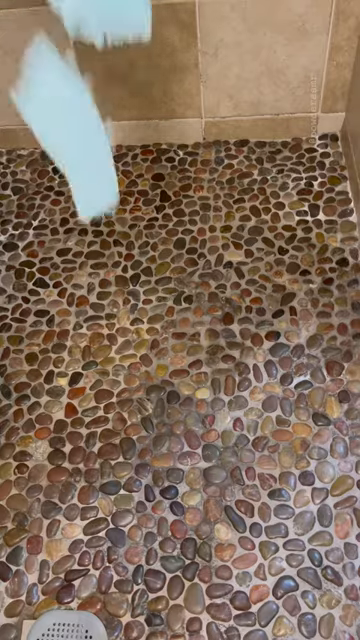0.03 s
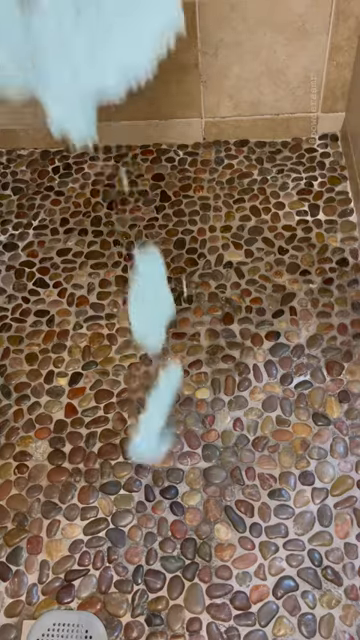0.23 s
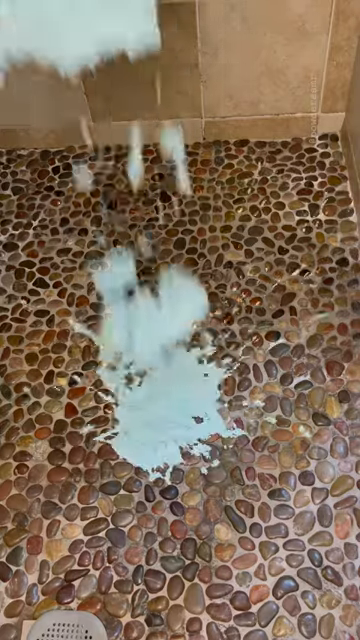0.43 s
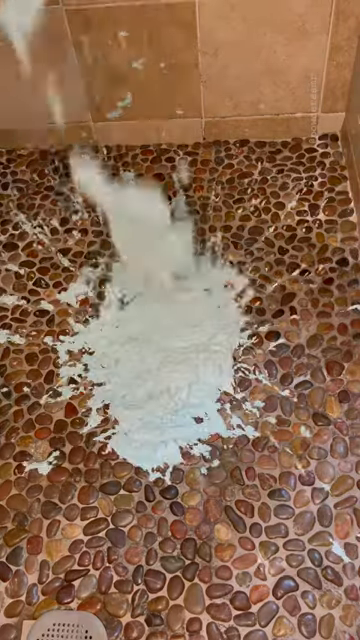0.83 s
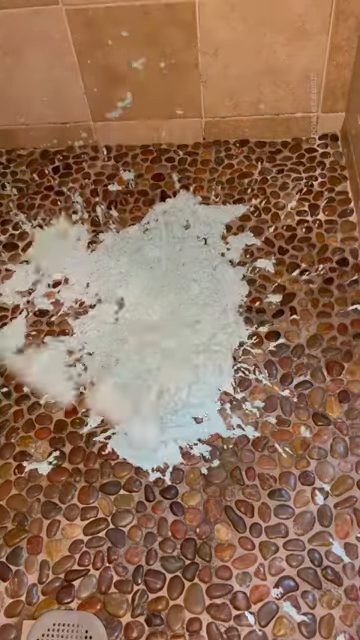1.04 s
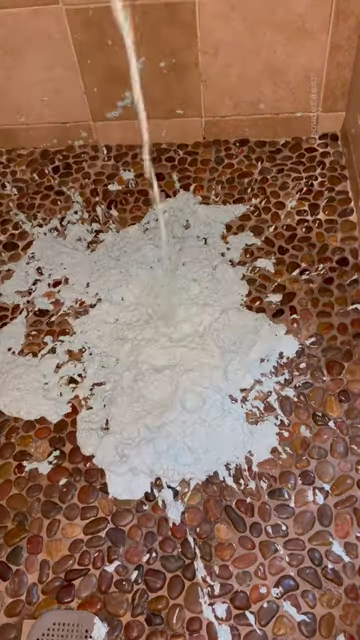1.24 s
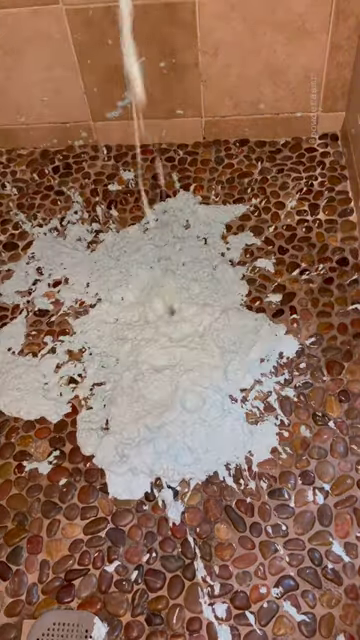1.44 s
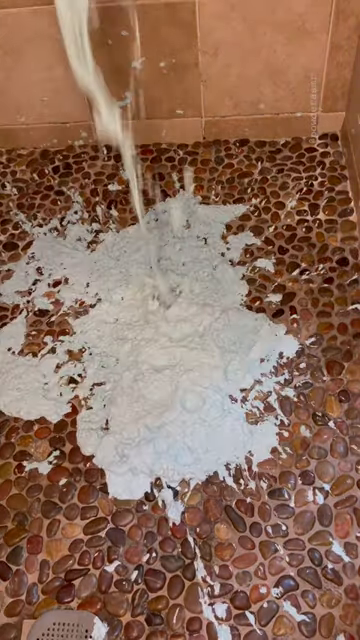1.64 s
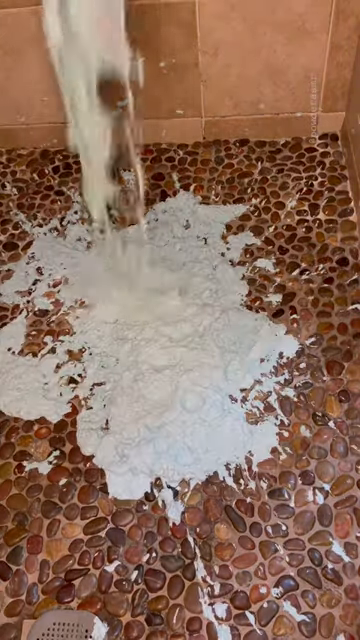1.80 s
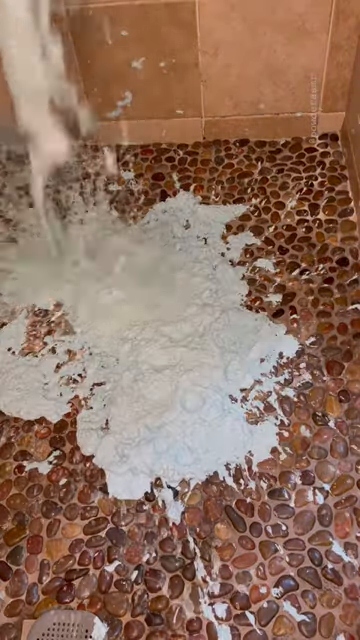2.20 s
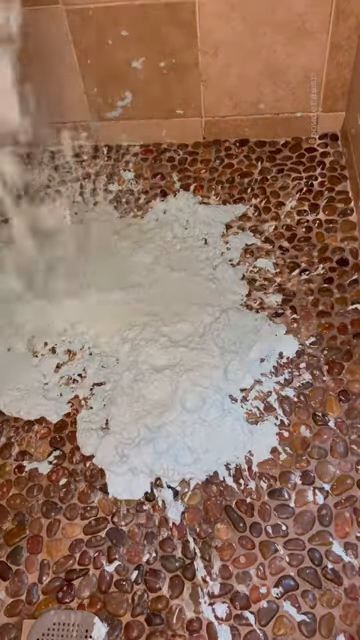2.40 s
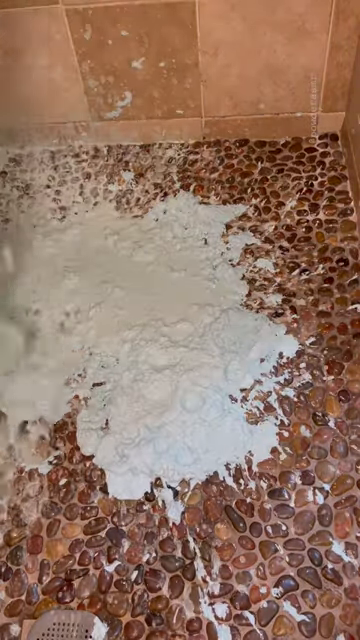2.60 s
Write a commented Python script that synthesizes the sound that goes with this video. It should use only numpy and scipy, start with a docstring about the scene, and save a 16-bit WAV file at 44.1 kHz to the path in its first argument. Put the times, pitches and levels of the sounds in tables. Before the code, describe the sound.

Wet splats of paste thud onto stone, followed by a hissing, splashing pour.

```python
"""Paste and a pour in a shower stall

Inside a tiled shower, heard through a closely spaced microphone pair. In slow motion, lumps of thick
paste splat on the pebble floor, pop pockets of air and set the stall booming over a faint rush and hum.
Then, at normal speed, a thin stream lands in the paste and swells to a pour: its droplets hiss and
splash, the puddle gurgles, bubbles ring, and the nearby tiles echo it all."""
import sys
import numpy as np
from scipy import signal
from scipy.fft import rfft, irfft
from scipy.io import wavfile

SR = 44100
rng = np.random.default_rng(int(sys.argv[2]) if len(sys.argv) > 2 else 0)


def inscribe(sig):
    """Save sig as 16-bit PCM at rate SR to the path in sys.argv[1].

    A 1-D sig is mono; a 2-D sig holds one channel per row.
    Samples are clipped to [-1, 1] before scaling.
    """
    pcm = np.round(np.clip(np.atleast_2d(sig).T, -1, 1) * 32767)
    wavfile.write(sys.argv[1], SR, pcm.astype(np.int16))


N = 121275
TIME = np.arange(N) / SR
SLOW_SPEED, CUT_S = .665, 1.184  # the slow motion: its speed and its end

# Lumps landing (time [s], rise [s], fade [s], thud [dB], squelch [dB], slap [dB], spray [dB])
LUMPS = [(0.1989, 0.0041, 0.021, -26.5, -18, -25, -14), (0.271, 0.0051, 0.018, -29.5, -24.5, -20, -15),
         (.428, 0.0029, 0.0078, -11.5, -12.5, -12, -6.5), (0.485, 0.031, 0.19, -36, -33.5, -37, -31.5),
         (0.64, 0.0032, 0.0049, -5.5, -11.5, -13.5, -8), (0.695, 0.032, 0.044, -28, -22, -27, -23.5),
         (0.82, 0.012, 0.014, -22.5, -17, -22, -23), (.862, 0.0136, 0.02, -24.5, -27, -25.5, -24),
         (.972, 0.005, 0.014, -26, -20, -23.5, -17), (1.032, 0.0088, 0.0043, -48, -51, -28.5, -24.5),
         (1.083, 0.024, 0.0074, -43, -30.5, -47, -60)]
THUD_LAG_S, THUD_PULSE_S, THUD_FADE_S, BOOM_DB = .00526, .0012, .022, 24
SQUELCH_LAG_S, SQUELCH_STRETCH = .005, 1.34
# Air pockets popping under the lumps, and the ringing of two slaps (time [s], pitch [Hz], level [dB])
PASTE_POCKETS = [(.205, 340, -17), (.208, 489.5, -20), (.273, 2350, -13), (.641, 1483, -11.5),
                 (.838, 530.3, -17), (.866, 643.6, -17), (.985, 524.3, -18)]
# Spectra of the four parts of a splat (frequency [Hz], relative level [dB])
THUD_TONE = [(25, -26), (55, -3), (115, 0), (290, -5.5), (700, -51.5)]
SQUELCH_TONE = [(80, -15), (260, -0.5), (560, 3.5), (1000, -9), (2000, -76.5)]
SLAP_TONE = [(300, -29), (800, -3.5), (2300, -2.5), (4200, -11.5), (7000, -41)]
SPRAY_TONE = [(1000, -16.5), (5000, -7), (8000, -5.5), (10300, -2), (11200, -4.5), (12200, -15),
              (15000, -87)]

# Strength of the stream (time [s], hiss [dB], splash [dB], gurgle [dB])
POUR_FLOW = [(1.185, -24.5, -38, -33), (1.30, -27.5, -39, -41), (1.365, -29.5, -34.5, -35.5),
             (1.40, -33.5, -45, -40.5), (1.60, -23, -35.5, -34.5), (1.65, -18, -31, -35),
             (1.701, -27, -37.5, -36), (1.75, -24, -37, -38), (1.78, -18.5, -33, -35.5),
             (2.01, -15.5, -29.5, -38), (2.09, -19.5, -31, -31.5), (2.142, -13.5, -24.5, -29.5),
             (2.22, -19.5, -35.5, -39.5), (2.29, -16, -32.5, -38.5), (2.35, -19.5, -31, -40),
             (2.40, -21, -43, -39), (2.47, -20, -33.5, -34), (2.55, -26.5, -38, -47.5),
             (2.615, -22, -32.5, -30), (2.66, -25.5, -34.5, -41.5), (2.71, -22.5, -32.5, -43.5)]
# Gouts hitting the puddle with a crack and a short spray (time [s], hiss [dB], splash [dB])
POUR_GOUTS = [(1.185, -20, -30.5), (1.404, -24, -53), (1.505, -19.5, -37.5), (1.615, -22, -37),
              (1.642, -18, -26), (1.7547, -14, -42), (1.99, -20, -23.5), (2.309, -27, -34),
              (2.465, -15.5, -47)]
GOUT_RISE_S, GOUT_FADE_S, CRACK_FADE_S, CRACK_DB = .0004, .0066, .0014, 3
# Air pockets closing in the puddle; the tiniest tick (time [s], pitch [Hz], level [dB])
POUR_POCKETS = [(1.186, 10500, -15), (1.19, 1554, -20), (1.269, 859, -26.5), (1.404, 5445, -16),
                (1.509, 657, -22.5), (1.652, 667, -26.5), (1.99, 1129, -14), (1.998, 1612, -26),
                (2.002, 620.4, -27), (2.101, 670, -26.5), (2.128, 1021, -20), (2.256, 992, -24.5),
                (2.346, 1000, -24.5), (2.433, 978, -14.5), (2.435, 543.7, -25.5)]
# Spectra of the three parts of the pour (frequency [Hz], relative level [dB])
HISS_TONE = [(500, -52), (1500, -13), (4000, -3.5), (12000, 1), (15000, 6.5)]
SPLASH_TONE = [(400, -8.5), (1100, -4), (1600, 5), (3400, 6.5), (5000, 2), (9000, -11)]
GURGLE_TONE = [(25, -36), (80, -2.5), (420, -7), (700, -1), (1080, -1), (1450, -25), (2500, -29)]
FLUTTER_DB, CHURN_DB = 3, 2.95  # depth of the random level swings

POP_DB, FIZZ_DB = -11.5, -7  # small bubbles in the paste and in the pour
PLOP_CYCLES, BUBBLE_CYCLES = 6.74, 5  # decay times, in periods
BUBBLE_GLIDE, PLOP_WAVER = .07, .21  # as shares of the pitch

# Standing waves of the stall at normal speed (frequency [Hz], level [dB], 60 dB decay [s])
STALL_MODES = [(141, 0, .25), (231, 7, .36), (331, 0, .27), (417, -2, .2), (546, 1, .3), (643, -3, .3),
               (772, 0, .35), (965, 3, .36)]
# Echo off the tiles at normal speed (frequency [Hz], 60 dB decay [s])
TILE_DECAY = [(170, .16), (500, .38), (3000, .32), (15000, .27)]
DIRECT_DB, ECHO_DB, MODES_DB = -2.5, -3.5, -2.5
FIRST_ECHO_S, ECHOES_PER_S = .0014, 4000
# Microphone pair at normal speed (frequency [Hz], left phase lead [rad], likeness [0-1])
MIC_PAIR = [(150, 0, .997), (600, 0, .98), (1200, -.1, .9), (1650, -.2, .6), (2800, 0, .99),
            (4300, .5, .55), (6400, .7, .5), (7300, 3.14, .88), (7800, 4.8, .62), (8450, 6.28, .997),
            (9500, 6.28, .99), (10000, 7, .75), (11600, 8.2, .78), (13500, 9.4, .998), (15700, 10.3, .78)]
# Room tone under the paste (frequency [Hz], relative level [dB])
AIR_TONE = [(25, -18), (70, 5.5), (120, -10), (600, -8), (1200, -23.5), (5000, -25.5), (10300, -17.5),
            (13000, -44)]
AIR_DB, HUM_HZ, HUM_DB = -45.5, 120.8, -44


def paste():
    """Each lump slaps the floor, throws spray, squeezes out air and thuds, setting the stall booming."""
    push, thud, squelch, slap, spray = np.zeros((5, N))
    for s, rise, fade, thud_db, squelch_db, slap_db, spray_db in LUMPS:
        age = np.maximum(TIME - s - rise - THUD_LAG_S, 0) / THUD_PULSE_S
        push += amp(thud_db) * (age > 0) * (1 - age) * np.exp(-age)  # one pressure pulse
        thud += amp(thud_db) * burst(s + THUD_LAG_S, rise + THUD_PULSE_S, THUD_FADE_S)
        squelch += amp(squelch_db) * burst(s + SQUELCH_LAG_S, rise, fade * SQUELCH_STRETCH)
        slap += amp(slap_db) * burst(s, rise, fade)
        spray += amp(spray_db) * burst(s, rise, fade)
    layers = [(thud, THUD_TONE), (squelch, SQUELCH_TONE), (slap, SLAP_TONE), (spray, SPRAY_TONE)]
    splats = sum(colour(level * droplets(per_s=5000, spread_db=3.5), tone) for level, tone in layers)
    splats += amp(POP_DB) * bubbles(squelch, per_s=310, low_hz=275.6, high_hz=727)
    splats += amp(POP_DB) * bubbles(slap, per_s=310, low_hz=1204, high_hz=2450)
    boom = amp(BOOM_DB) * signal.fftconvolve(push, standing_waves(SLOW_SPEED))[:N]
    return stall(splats + plops(PASTE_POCKETS), SLOW_SPEED) + boom


def pour():
    """The stream breaks into droplets that hiss and splash, and churns the puddle."""
    times, *levels = np.transpose(POUR_FLOW)
    hiss, splash, gurgle = (amp(np.interp(TIME, times, db)) * (TIME > CUT_S) for db in levels)
    flutter = unit(amp(FLUTTER_DB * wander(hz=47)))
    hiss *= flutter
    splash *= flutter
    gurgle *= unit(amp(CHURN_DB * wander(hz=30)))
    for s, hiss_db, splash_db in POUR_GOUTS:
        crack = amp(CRACK_DB) * burst(s, GOUT_RISE_S, CRACK_FADE_S)
        hit = crack + burst(s, GOUT_RISE_S, GOUT_FADE_S)
        hiss += amp(hiss_db) * hit
        splash += amp(splash_db) * hit
    layers = [(hiss, HISS_TONE), (splash, SPLASH_TONE), (gurgle, GURGLE_TONE)]
    stream = sum(colour(level * droplets(per_s=4000, spread_db=2.5), tone) for level, tone in layers)
    fizz = amp(FIZZ_DB) * bubbles(splash, per_s=800, low_hz=914, high_hz=4164)
    return stall(stream + fizz + plops(POUR_POCKETS), speed=1)


def droplets(per_s, spread_db):
    """Droplets click at random moments, many small and a few large."""
    size = amp(spread_db * np.minimum(rng.exponential(1, N), 4))
    polarity = rng.choice([-1, 1], N)
    lands = rng.random(N) < per_s / SR
    return unit(size * polarity * lands)


def plops(pockets):
    """A pocket of air or a struck slap swells and rings for a few uneven cycles, rising a little in pitch."""
    out = np.zeros(N)
    for s, hz, db in pockets:
        fade = PLOP_CYCLES / hz
        glide = BUBBLE_GLIDE * (np.clip((TIME - s) / fade, 0, 2) - 1)
        pitch = hz * (1 + glide + PLOP_WAVER * wander(hz / 2))
        tone = np.sin(2 * np.pi * np.cumsum(pitch) / SR)
        out += amp(db) * burst(s, fade / 2, fade) * unit(tone)
    return out


def bubbles(level, per_s, low_hz, high_hz, sizes=24):
    """Bubbles of many sizes burst at random, each a short ring that rises in pitch."""
    t, out = TIME[:SR // 10], np.zeros(N)
    for hz in np.geomspace(low_hz, high_hz, sizes):
        age = t * hz / BUBBLE_CYCLES
        pitch = hz * (1 + BUBBLE_GLIDE * np.minimum(age, 2))
        ring = np.exp(-age) * np.sin(2 * np.pi * np.cumsum(pitch) / SR)
        pops = level * droplets(per_s / sizes, spread_db=2)
        out += signal.oaconvolve(pops, ring / np.linalg.norm(ring))[:N]
    return out / np.sqrt(sizes)


def stall(x, speed):
    """What reaches the microphones: direct sound, dense echoes off the tiles and standing waves."""
    t = TIME[:SR]
    reflections = rng.standard_normal((2, SR)) * (rng.random((2, SR)) < ECHOES_PER_S / SR)
    reflections *= t > FIRST_ECHO_S / speed
    hz, delay, bands = signal.stft(reflections, SR, nperseg=256)
    t60 = read(TILE_DECAY, hz / speed)[:, None] / speed
    echo = signal.istft(bands * np.exp(-np.log(1000) * delay / t60), SR)[1][:, :SR]
    echo *= amp(ECHO_DB) / np.linalg.norm(echo, axis=1, keepdims=True)
    mid = echo[0] + amp(DIRECT_DB) * (t == 0) + amp(MODES_DB) * standing_waves(speed)
    side = echo[1] * np.hypot(1, amp(DIRECT_DB - ECHO_DB))  # as strong as direct sound plus echo
    return mic_pair(signal.fftconvolve(x, mid)[:N], signal.fftconvolve(x, side)[:N], speed)


def standing_waves(speed):
    """The air between the walls rings after a click, lower and longer in slow motion."""
    t, ring = TIME[:SR], 0
    for hz, db, t60 in STALL_MODES:
        damping = np.log(1000) * speed / t60
        envelope = amp(db) * 2 * damping / SR * np.exp(-damping * t)
        ring += envelope * np.cos(2 * np.pi * hz * speed * t)
    return ring


def mic_pair(mid, side, speed):
    """Two unrelated signals become left and right, their likeness and phase varying with frequency."""
    hz = np.fft.rfftfreq(2 * N, 1 / SR) / speed
    lead, likeness = read(MIC_PAIR, hz), np.clip(read(MIC_PAIR, hz, column=2), 0, 1)
    common = rfft(mid, 2 * N) * np.sqrt((1 + likeness) / 2)
    apart = rfft(side, 2 * N) * np.sqrt((1 - likeness) / 2)
    return irfft([common + apart, (common - apart) * np.exp(-1j * lead)])[:, :N]


def room_tone():
    """A faint rush of air and a low hum in the background."""
    mid, side = (colour(rng.standard_normal(N), AIR_TONE) for _ in range(2))
    hum = unit(np.sin(2 * np.pi * HUM_HZ * TIME))
    return amp(AIR_DB) * mic_pair(mid, side, SLOW_SPEED) + amp(HUM_DB) * hum


def burst(s, rise, fade):
    """Straight attack from time s, then an exponential release."""
    t = TIME - s
    return np.clip(t / rise, 0, 1) * np.exp(-np.maximum(t - rise, 0) / fade)


def wander(hz):
    """Random motion, mostly slower than the given rate."""
    rolloff = 1 + (np.fft.rfftfreq(N, 1 / SR) / hz) ** 2
    return unit(irfft(rfft(rng.standard_normal(N)) / rolloff, N))


def colour(x, spectrum, size=4096):
    """Shapes a sound with a minimum-phase filter of unit energy."""
    hz = abs(np.fft.fftfreq(size, 1 / SR))
    log_gain = np.log(amp(read(spectrum, hz)))
    response = np.exp(np.conj(signal.hilbert(log_gain)))
    taps = np.fft.ifft(response).real[:size // 2]
    return signal.fftconvolve(x, taps / np.linalg.norm(taps))[:N]


def read(table, hz, column=1):
    """One column of a table, interpolated on a log-frequency axis."""
    rows = np.array(table, float)
    return np.interp(np.log(hz + 1), np.log(rows[:, 0] + 1), rows[:, column])


def amp(db):
    """Decibels to gain."""
    return 10 ** (np.asarray(db) / 20)


def unit(x):
    """Scales to an rms of one."""
    return x / np.sqrt(np.mean(x ** 2) + 1e-20)


def scene():
    """Paste and room tone, cut off where the pour begins."""
    before_cut = np.clip((CUT_S - TIME) / .005 + 1, 0, 1)
    return (paste() + room_tone()) * before_cut + pour()


def record(dry, cutoff_hz=15850):
    """After the microphones, the loudest peaks are rounded off and the top treble is cut."""
    rounded = dry / (1 + dry ** 6) ** (1 / 6)
    lowpass = signal.firwin(511, cutoff_hz, window=("kaiser", 8), fs=SR)
    return signal.oaconvolve(rounded, lowpass[None], "same")


dry = scene()
out = record(dry)
inscribe(out)
```